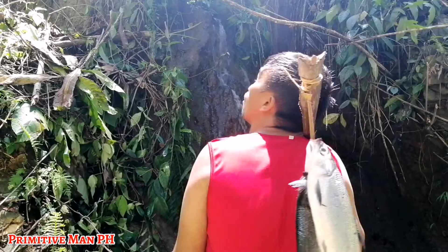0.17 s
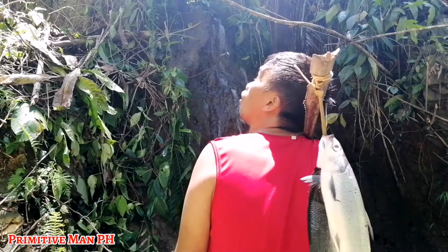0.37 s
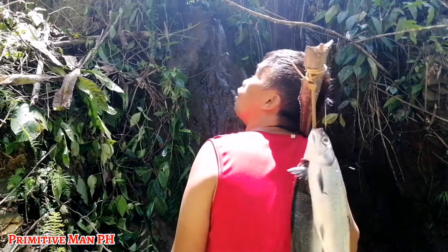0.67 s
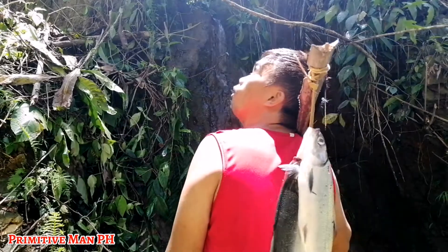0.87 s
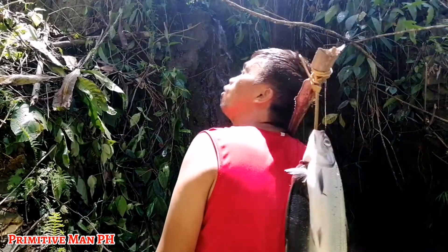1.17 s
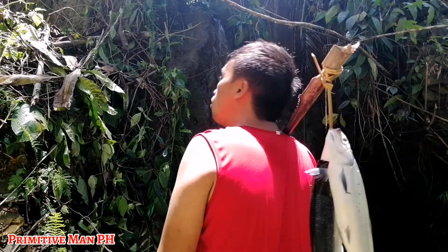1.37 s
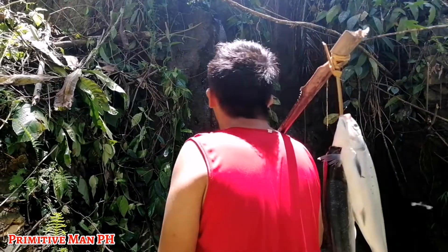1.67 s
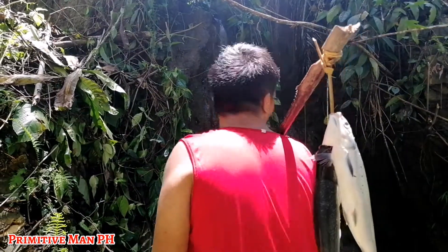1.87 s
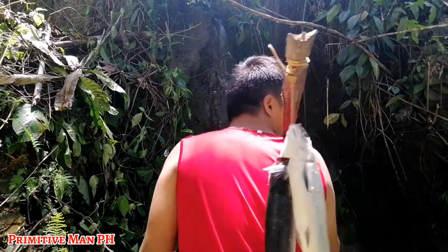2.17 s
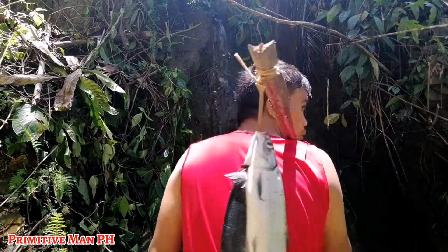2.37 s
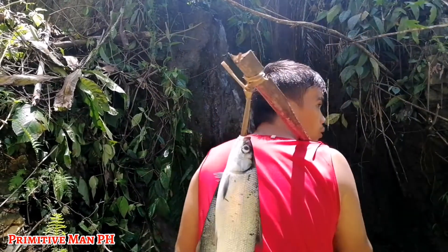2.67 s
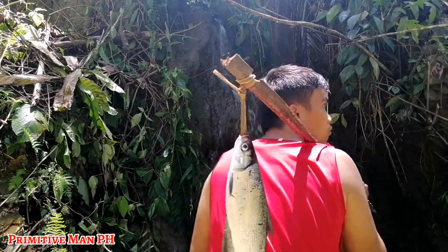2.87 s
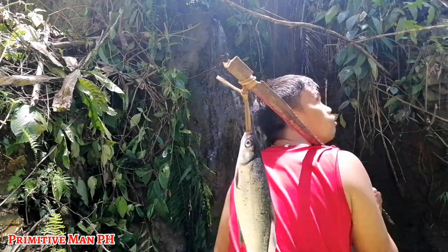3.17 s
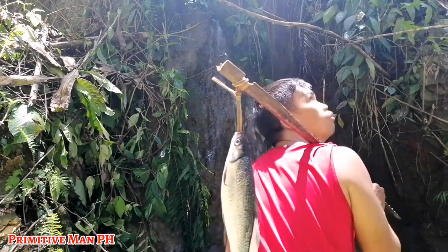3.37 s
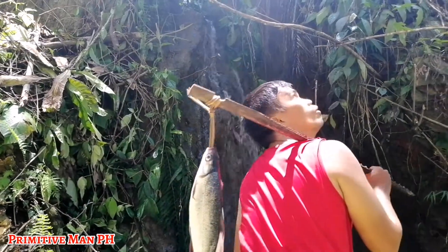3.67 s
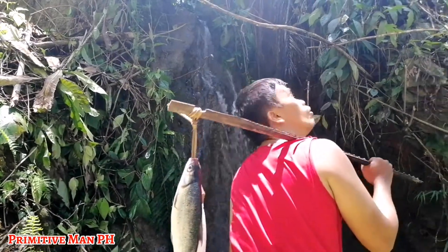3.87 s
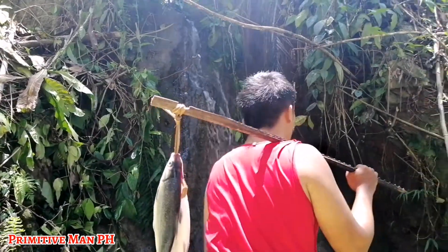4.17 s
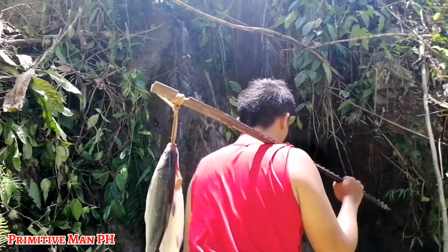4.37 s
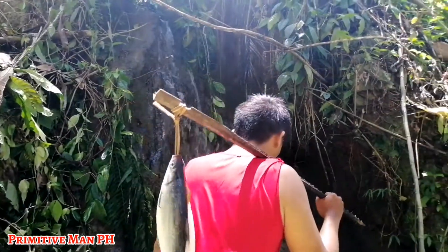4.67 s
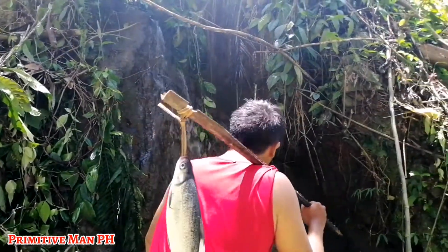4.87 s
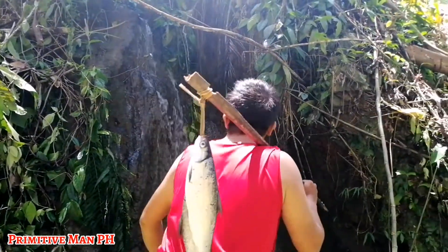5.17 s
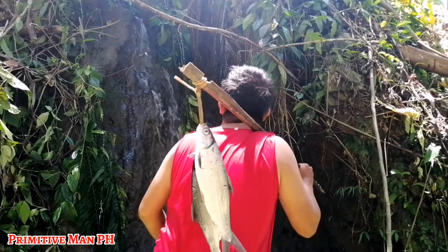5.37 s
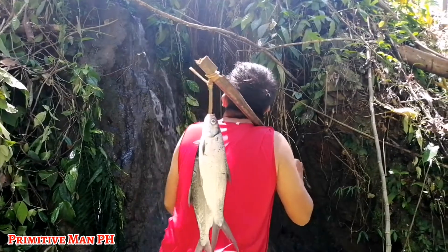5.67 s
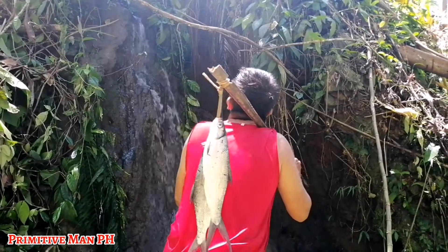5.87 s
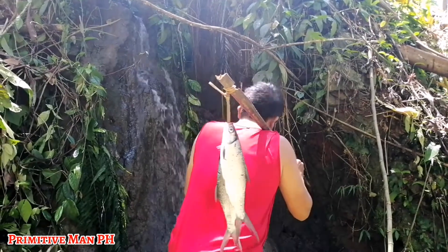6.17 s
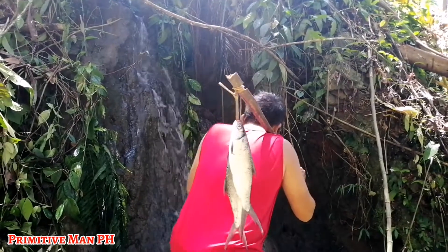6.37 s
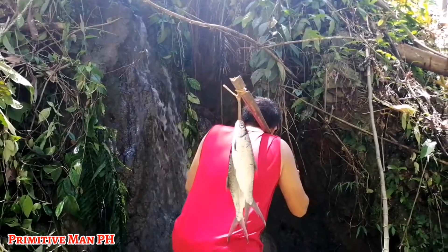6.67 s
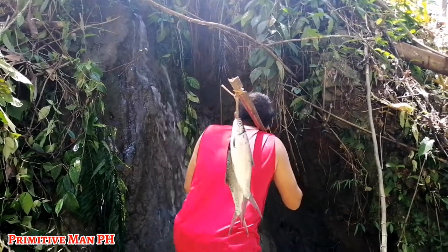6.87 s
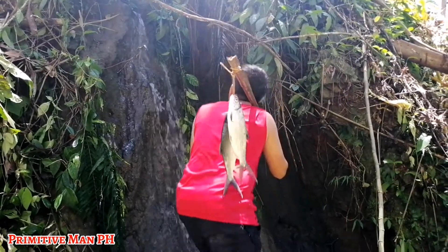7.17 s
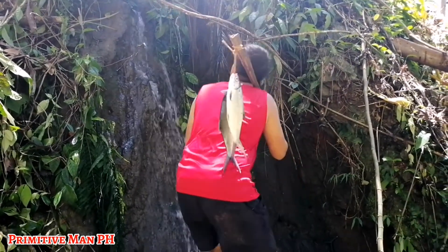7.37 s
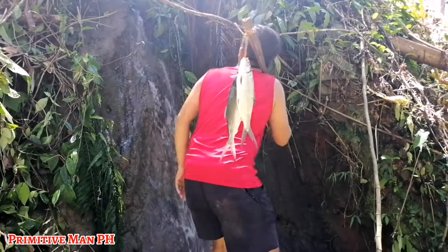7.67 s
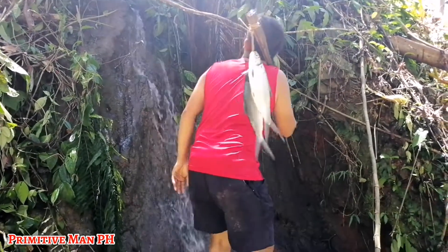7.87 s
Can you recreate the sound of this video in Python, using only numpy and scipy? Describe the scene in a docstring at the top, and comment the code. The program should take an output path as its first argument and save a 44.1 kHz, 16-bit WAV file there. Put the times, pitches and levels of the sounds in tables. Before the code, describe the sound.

After a brief silence, a small waterfall fades in quickly and runs steadily down rock in a leafy gully. Dense spray hisses brightly over a soft, hollow gurgle, with bubbles plopping and droplets ticking. A faint puff of air bumps the left side early on. Heavy splashes become more frequent near the end. Close stereo microphones, leaning slightly right.

```python
"""Small waterfall in a gully

A small waterfall runs down a rock face in a leafy gully, heard by two microphone ports a hand apart.
Drop impacts beat bands of noise into a grainy hiss; heavy splashes add dry ticks; rising, dying sines
are the bubbles of the pool and the gulps of a hollow in the rock; pressure pulses are puffs of air, one
mainly on the left port, a faint one on both. The sound fades in and drops at the very end."""
import sys
import numpy as np
from scipy import signal
from scipy.io import wavfile
from scipy.ndimage import map_coordinates

SR = 44100
rng = np.random.default_rng(int(sys.argv[2]) if len(sys.argv) > 2 else 0)


def unload_audio(sound):
    """Save the sound as a 16-bit wav file, at the path given as the first command line argument."""
    columns = np.transpose(np.atleast_2d(sound))
    # keep every value between -1 and 1, then stretch to whole-number steps
    steps = np.round(np.clip(columns, -1, 1) * 32767)
    wavfile.write(sys.argv[1], SR, steps.astype(np.int16))


def decibels_to_gain(level_db):
    """Convert a level in decibels to a linear amplitude gain (20 dB per decade)."""
    exponent = np.asarray(level_db, float) / 20
    return 10 ** exponent


N = 354034


def rms_one(x):
    """Scale to rms 1."""
    return x / np.sqrt(np.mean(x ** 2) + 1e-20)


def in_time(rows):
    """Columns of a time table, interpolated at every sample."""
    s, *columns = np.transpose(rows)
    t = np.arange(N) / SR
    return [np.interp(t, s, column) for column in columns]


def at_hz(points, hz):
    """Read a spectrum on a log frequency axis."""
    points_hz, values = np.transpose(points)
    return np.interp(np.log(hz), np.log(points_hz), values)


def drift(rate_hz):
    """Slow chance of spread 1: noise at every 40th sample through a double one-pole."""
    r = np.exp(-2 * np.pi * rate_hz * 40 / SR)
    noise = rng.standard_normal(N // 40 + 2002)
    slow = signal.lfilter([1], [1, -2 * r, r * r], noise)[2000:]  # run-in cut off
    return np.interp(np.arange(N) / 40, np.arange(len(slow)), rms_one(slow))


def peaks(x, resonances):
    """Resonances as a chain of peaking filters."""
    for hz, width_hz, gain_db in resonances:
        w = 2 * np.pi * hz / SR
        a = np.sqrt(decibels_to_gain(gain_db))
        q = np.sin(w) * width_hz / hz / 2
        zeros = [1 + q * a, -2 * np.cos(w), 1 - q * a]
        poles = [1 + q / a, -2 * np.cos(w), 1 - q / a]
        x = signal.lfilter(zeros, poles, x)
    return x


def dying(clicks, decay_s):
    """Every click starts at its height and dies exponentially."""
    return signal.lfilter([1], [1, -np.exp(-1 / (decay_s * SR))], clicks + 1e-18)


# Listener turns and steps closer: [t/s, left lag behind right/ms, left minus right/dB, spray gain/dB]
BEARING = [(0, 0.14, -3.5, 1), (1.7, 0.17, -3.5, 0), (3.3, 0.14, -3, 0.2), (4.5, 0.13, -3.4, 0),
           (5.8, 0.14, -2.5, 0.1), (6.1, -0.16, -2.5, 0.8), (8, -0.15, -3, 0.5)]


def to_ports(x):
    """Travel time: the left port hears the fall slightly later or earlier than the right."""
    lag = in_time(BEARING)[0] * SR / 1000
    left = map_coordinates(x, [np.arange(N) - lag], order=3, mode="nearest")
    return np.array([left, x])


# Heavy splashes on the rock: [t/s, power over mean patter/dB]
SPLASHES = [(0.8141, 6), (1.5115, 8), (1.8089, 3), (2.0648, 6), (2.2294, 8), (2.4699, 9.5), (5.701, 9.5),
            (6.4897, -2), (6.583, 7), (6.8309, 7), (6.947, 7), (7.0425, 10), (7.2714, 10), (7.4974, 0),
            (7.8775, 11.5), (7.996, -4)]


def splash_clicks(heights):
    """One single-sample click per heavy splash."""
    clicks = np.zeros(N)
    clicks[(np.array(SPLASHES)[:, 0] * SR).astype(int)] = heights
    return clicks


def impacts(per_s, spread_db, decay_s):
    """Power of drop impacts: a dense patter of sudden, fast-dying bursts, plus the heavy splashes."""
    sizes = decibels_to_gain(spread_db * np.minimum(rng.exponential(1, N), 5))
    chance = per_s * decibels_to_gain(3.0 * drift(8)) / SR
    patter = dying(sizes * (rng.random(N) < chance), decay_s)
    splash_power = decibels_to_gain(np.array(SPLASHES)[:, 1]) ** 2
    return patter / patter.mean() + dying(splash_clicks(splash_power), 0.0044)


# Rush spectrum before control and resonance gains: [f/Hz, relative density/dB per Hz]
RUSH = [(20, -7.5), (70, -10), (150, -7.5), (260, -5.5), (500, -1), (1000, 3), (1350, 2.5), (1700, 3.5),
        (3000, 5.5), (5500, 1), (8000, 4), (12000, 3.5), (16000, -2)]
# Share of the noise common to both ports: [f/Hz, likeness/0-1]
LIKENESS = [(40, 0.1), (100, 0.6), (200, 0.98), (400, 0.8), (700, 0.76), (1000, 0.86), (1400, 0.19),
            (1800, 0.12), (2600, 0.06), (4000, 0.07), (8000, 0.05), (15000, 0)]
# Air resonances between the rocks: [f/Hz, width/Hz, gain/dB]
HOLLOWS = [(214, 49, 5.5), (330, 68, 9.5), (552, 95, 4.5), (680, 180, 2.5), (984, 98, 3), (1177, 48, 3.5),
           (1580, 155, 3.5)]
# Band split, gurgle | pool | spray: [f/Hz]
EDGES_HZ = [440, 4200]


def rush(controls_db):
    """Third-octave noise bands, beaten by impacts, more so in the treble; each also surges by itself."""
    beat = impacts(per_s=500.0, spread_db=4.5, decay_s=0.0026)
    white = rng.standard_normal((2, 3, N))  # neighbouring bands get unrelated noise
    common = [to_ports(w[0]) for w in white]
    surge = [drift(6) for _ in range(4)]  # one per eight bands
    edges_hz = 20 * 2 ** (np.arange(30) / 3)
    out = 0
    for k, (low_hz, high_hz) in enumerate(zip(edges_hz, edges_hz[1:])):
        hz = np.sqrt(low_hz * high_hz)
        alike = np.clip(at_hz(LIKENESS, hz), 0, 1)
        noise = np.sqrt(alike) * common[k % 2] + np.sqrt(1 - alike) * white[k % 2, 1:]
        share = np.clip(at_hz([(300, 0.069), (2000, 0.15), (9000, 0.34)], hz), 0, 1)
        beaten = noise * np.sqrt(1 - share + share * beat)
        sos = signal.butter(2, [low_hz, high_hz], "band", fs=SR, output="sos")
        band = signal.sosfilt(sos, beaten)
        control_db = controls_db[np.searchsorted(EDGES_HZ, hz)]
        own_swing_db = at_hz([(100, 1.4), (1000, 1.72), (9000, 0.43)], hz) * drift(14.0)
        patch_db = 0.2 * surge[k // 8] + own_swing_db
        out = out + band * decibels_to_gain(at_hz(RUSH, hz) + control_db + patch_db)
    return peaks(out, HOLLOWS)


def slaps(tick_db):
    """Dry tick of water on rock at each heavy splash: a high-passed click."""
    ticks = splash_clicks(decibels_to_gain(np.array(SPLASHES)[:, 1] + tick_db))
    sos = signal.butter(2, 2500, "high", fs=SR, output="sos")
    return to_ports(signal.sosfilt(sos, ticks + 1e-18))


def bubble(hz, height, cycles, rise):
    """Ringing bubble: a sine that swells in about a cycle, rises in pitch, dies 60 dB in the cycles."""
    t = np.arange(int(cycles / hz * SR)) * hz / SR  # in cycles of the starting pitch
    envelope = (1 - np.exp(-t)) * decibels_to_gain(-60 * t / cycles)
    return height * envelope * np.sin(2 * np.pi * (t + rise * t * t / cycles))


# Loudest gulps of the hollow under the fall: [t/s, level before envelope and pan/dB]
GULPS = [(1.064, -29), (1.66, -29), (2.425, -32), (2.65, -33), (2.856, -32), (3.533, -31), (3.822, -31),
         (4.669, -32), (4.754, -27), (5.981, -33), (6.985, -35), (7.858, -29)]
# Biggest bubbles in the pool: [t/s, level before envelope and pan/dB, starting f/Hz]
PLOPS = [(0.794, -24.5, 680), (1.494, -21, 1170), (2.148, -21, 960), (2.338, -19, 1060), (3.402, -20, 1150),
         (3.409, -19, 2790), (3.802, -21, 1000), (3.931, -20, 1220), (4.049, -17, 1580), (4.466, -22, 1590),
         (4.621, -24.5, 620), (4.85, -22, 1140), (5.428, -17, 2090), (5.71, -21, 1010), (6.516, -14, 2000),
         (6.99, -23, 1600), (7.496, -15, 2570), (7.7, -22, 1390)]


def pool(count, crowd_db):
    """Bubbles ring: listed gulps and plops, lesser ones at random, and a crowd of small bubbles."""
    small_plop_db, plop_low_hz, plop_high_hz = -26, 450, 2900
    small_gulp_db, gulp_hz, gulp_scatter_hz = -39, 213.7, 8.4
    when, size, pitch = rng.random((count, 3)).T
    crowd = np.c_[when * N / SR, crowd_db - 5.0 * np.log(size + .02), 300 * 20.0 ** pitch]

    when, size, pitch = rng.random((40, 3)).T
    plop_hz = plop_low_hz * (plop_high_hz / plop_low_hz) ** pitch
    plops = np.r_[PLOPS, np.c_[when * N / SR, small_plop_db + 4.0 * (size - .5), plop_hz]]

    when, size = rng.random((20, 2)).T
    gulps = np.r_[GULPS, np.c_[when * N / SR, small_gulp_db + 4.0 * (size - .5)]]
    gulps = np.c_[gulps, gulp_hz + gulp_scatter_hz * rng.standard_normal(len(gulps))]

    out = np.zeros(N + SR)
    for rows, cycles, rise in ((gulps, 24.0, .07), (plops, 38.0, .1), (crowd, 24.0, .2)):
        for s, level_db, hz in rows:
            ring = bubble(hz, decibels_to_gain(level_db), cycles, rise)
            start = int(s * SR)
            out[start:start + len(ring)] += ring
    return to_ports(out[:N])


# Puffs of air on the ports: [t/s, left push before leak/dB, right push before leak/dB]
PUFFS = [(2.317, -18.5, -28), (7.56, -47, -44)]


def puffs():
    """Pressure push, quick up and slower down; the port leaks, so it swings under afterwards."""
    out = np.zeros((2, N))
    t = np.arange(N) / SR
    for s, left_db, right_db in PUFFS:
        push = np.interp(t - s, [0, .0065, .021], [0, 1, 0])
        out += push * decibels_to_gain(np.array([[left_db], [right_db]]))
    leak = signal.butter(2, 2.4, "high", fs=SR, output="sos")
    return signal.sosfilt(leak, out)


# Flow over the lip: [t/s, level swing/dB], in full on the spray, in part on the pool
FLOW = [(0.45, -1), (1.1, -0.6), (1.58, 0), (1.71, -1.5), (1.8, 0), (2.25, -0.1), (2.3, 2), (2.36, -0.3),
        (2.51, 0.9), (2.58, -0.5), (4.77, 0), (4.92, -1), (5.03, 1.2), (5.15, -1.5), (5.36, .5), (5.9, 0),
        (6.04, 2.5), (6.16, -1.2), (6.3, 0.3), (7.46, 0.9), (7.57, 2.5), (7.65, -1), (7.72, 1.5),
        (7.79, 0.2), (7.99, 1.5)]


def scene():
    """Water, leaning to the right, and air on the ports."""
    flow_db, = in_time(FLOW)
    _, pan_db, near_db = in_time(BEARING)
    gurgle_db = -27.5 + 1.2 * drift(1.5)  # wanders by itself
    pool_db = -26.5 + 0.45 * flow_db
    spray_db = -25.5 + flow_db + near_db
    water = rush([gurgle_db, pool_db, spray_db])
    water = water + pool(count=1400, crowd_db=-43.5) + slaps(tick_db=-19)
    return water * decibels_to_gain(np.array([pan_db, -pan_db]) / 2) + puffs()


def roll_off(x):
    """The treble ends steeply here."""
    return signal.sosfilt(signal.butter(12, 15520, fs=SR, output="sos"), x)


# Port resonances: [f/Hz, width/Hz, gain/dB]
LEFT_PORT = [(11000, 4100, 12)]
RIGHT_PORT = [(9720, 4520, 13), (3480, 1100, 5.5), (5050, 4200, -1)]


def record(dry):
    """Each port has its own resonances and rounds loud peaks; the level fades in and drops at the end."""
    fade_start_s, fade_s, fade_power = .221, .2, 1.55
    end_s, end_db = 7.999, -6
    t = np.arange(N) / SR
    fade = np.clip((t - fade_start_s) / fade_s, 0, 1) ** fade_power
    fade = fade * decibels_to_gain(np.interp(t, [end_s, end_s + 0.0028], [0, end_db]))
    ports = np.array([peaks(dry[0], LEFT_PORT), peaks(dry[1], RIGHT_PORT)])
    ports = 1.2 * np.tanh(ports / 1.2)
    return roll_off(ports * fade)


dry = scene()
out = record(dry)
unload_audio(out)
```